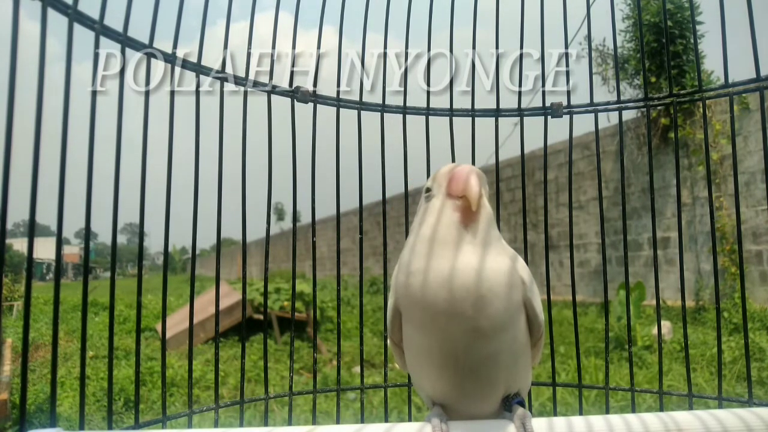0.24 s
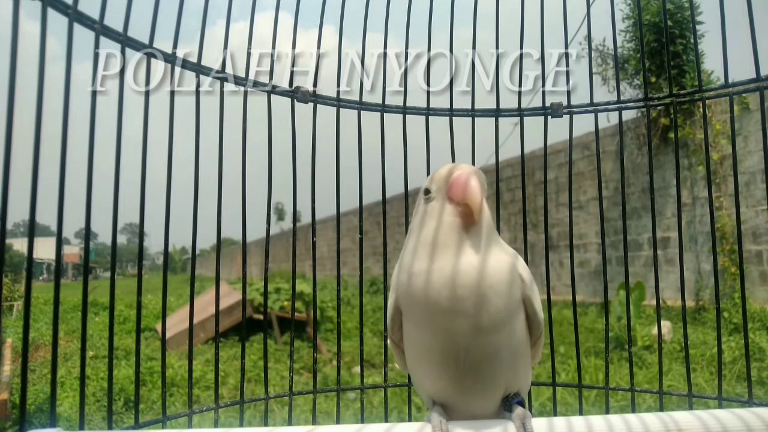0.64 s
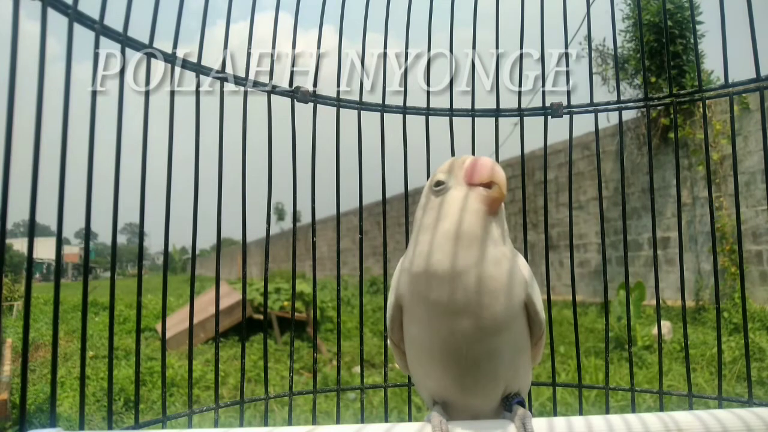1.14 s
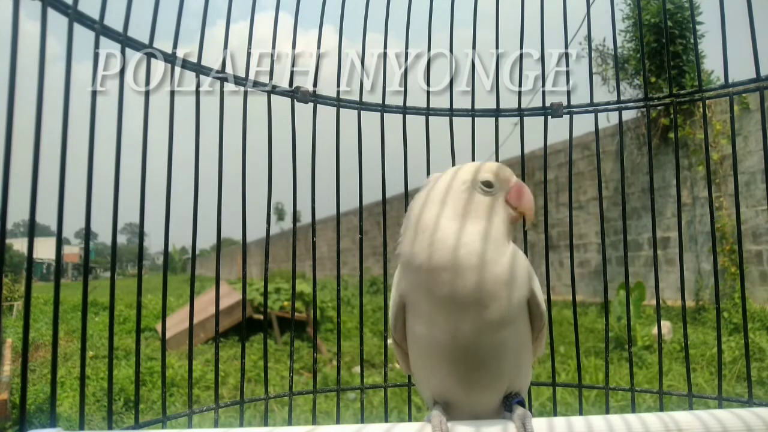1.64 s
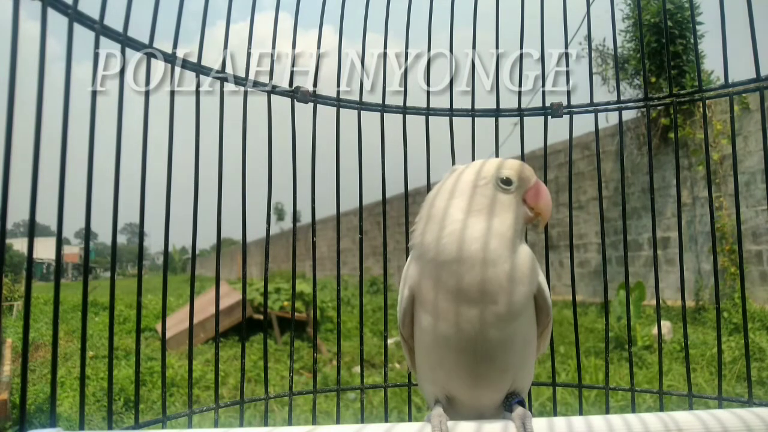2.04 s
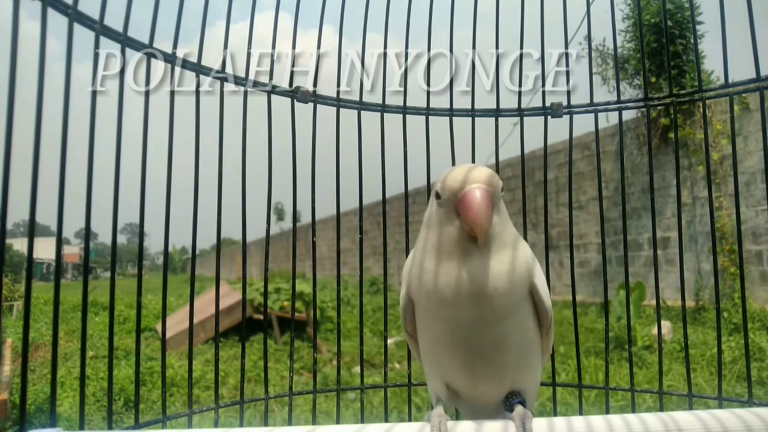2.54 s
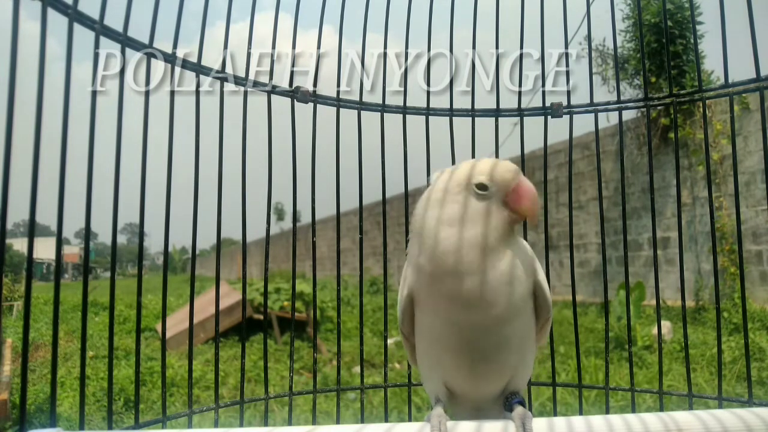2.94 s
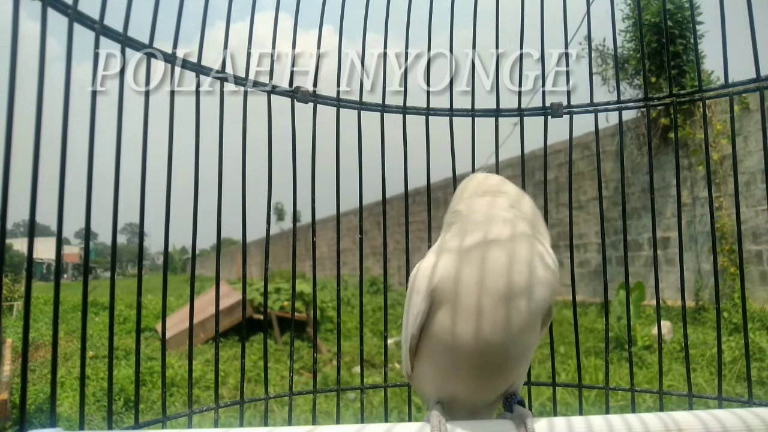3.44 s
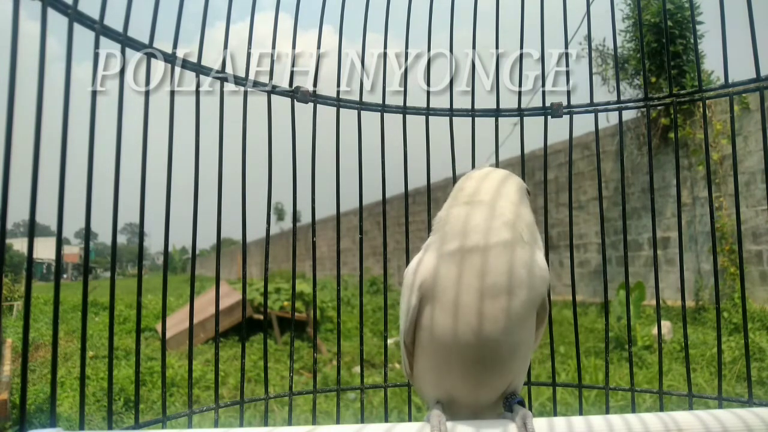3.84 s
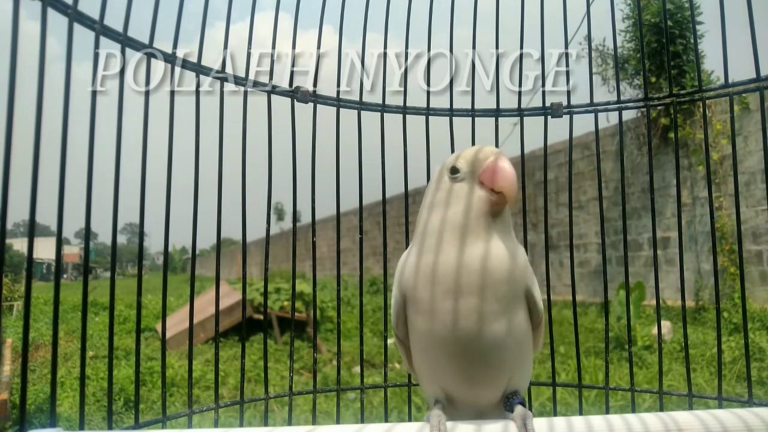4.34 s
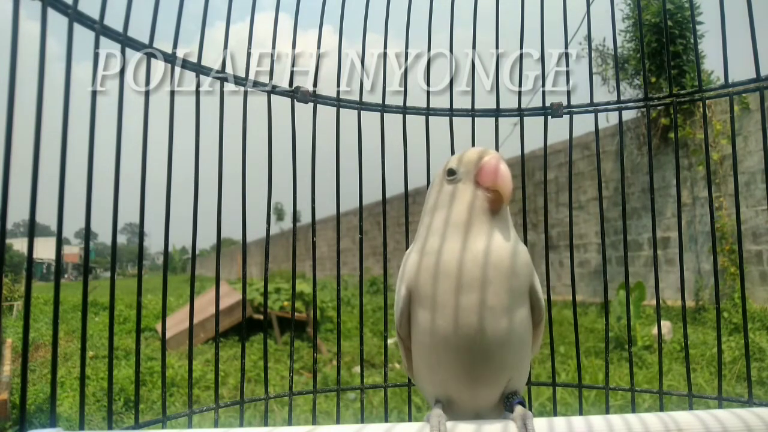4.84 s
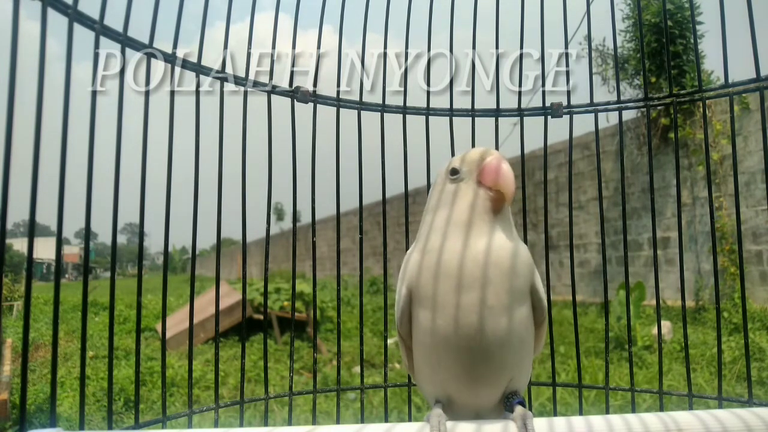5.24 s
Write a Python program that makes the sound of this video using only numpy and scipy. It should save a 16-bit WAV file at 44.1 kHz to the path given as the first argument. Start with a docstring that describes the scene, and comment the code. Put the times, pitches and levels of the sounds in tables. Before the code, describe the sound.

A caged lovebird gives four short shrill calls up close, with soft ticks between, a distant rooster and a low outdoor rumble.

```python
"""A caged lovebird, close to the microphone in a garden, gives four shrill calls with soft ticks between.
Each call is a quick run of notes, some clean whistles, some fast rasping warbles: the syrinx buzzes,
throat and beak colour the buzz, and every note glides, arches and swells with the push of air.
Far off a rooster crows, over a low outdoor rumble, two faint hums, soft hiss and a steady high whine."""
import sys
import numpy as np
from scipy import signal
from scipy.fft import rfft, irfft, next_fast_len
from scipy.io import wavfile

SR = 44100
rng = np.random.default_rng(int(sys.argv[2]) if len(sys.argv) > 2 else 0)


def master_out(mix):
    """Clip the mix to full scale and print it as 16-bit PCM to the path in sys.argv[1]."""
    frames = np.transpose(np.atleast_2d(mix))
    ceiling = np.clip(frames, -1, 1)
    pcm = np.round(ceiling * 32767).astype(np.int16)
    wavfile.write(sys.argv[1], SR, pcm)


N = 241668
TIME = np.arange(N) / SR
BAND_LIMIT_HZ = 15700


def amp(db):
    """Decibels to gain."""
    return np.exp(np.asarray(db) * np.log(10) / 20)


def unit_rms(x):
    """Scales to rms 1."""
    return x / np.sqrt(np.mean(x ** 2) + 1e-20)


def curve_at(points, hz):
    """Reads a curve on a log-frequency axis."""
    freqs, values = np.transpose(points)
    return np.interp(np.log(abs(hz) + 1), np.log(freqs + 1), values)


def add(mix, start_s, sound):
    """Mixes a sound in at its start time."""
    part = mix[round(start_s * SR):][:len(sound)]
    part += sound[:len(part)]


def noise(shape_db, n=N):
    """Noise of rms about 1 whose spectrum is a function of frequency."""
    size = next_fast_len(max(n, 4096))
    gains = amp(shape_db(np.fft.rfftfreq(size, 1 / SR)))
    return unit_rms(irfft(rfft(rng.standard_normal(size)) * gains, size))[:n]


def wander(rate_hz, n=N):
    """Random drift up to a given rate."""
    return noise(lambda f: -10 * np.log10(1 + (f / rate_hz) ** 4), n)


def hum(pitch_hz):
    """A slightly wavering tone of rms 1."""
    wavering_hz = pitch_hz * (1 + 0.01191 * wander(15))
    return unit_rms(np.sin(2 * np.pi * np.cumsum(wavering_hz) / SR))


# Low rumble of the open air: freq_hz, gain_db
RUMBLE_SPECTRUM = [(15, -6.5), (25, 2), (60, 4), (100, -8), (160, -14), (230, -16.5), (400, -21.5),
                   (600, -31), (1200, -39), (2600, -67)]
# The lower hum, swelling and fading in the background: time_s, level_db
DRONE_LEVELS = [(0, -73), (1.2, -48), (2.0, -58), (2.7, -48.5), (3.6, -59.5)]
# Soft hiss around the microphone: freq_hz, gain_db
HISS_SPECTRUM = [(300, 1), (900, 0), (2500, 1.5), (4000, -4), (6000, -3.5), (8200, 0), (10500, -5.5),
                 (11800, -16), (15300, -10)]
# The hiss holds, then sinks: time_s, level_db
HISS_LEVELS = [(3.6, -60.5), (4.6, -67)]
# A narrow high whine behind the birds: freq_hz, gain_db
WHINE_SPECTRUM = [(8000, -45), (8800, -18.5), (9400, -6), (9900, 2.5), (10400, -8), (10900, -33),
                  (11500, -60)]

def outdoors(rumble_db=-41, hum_db=-57, whine_db=-56):
    """The garden's background: three bands of noise and two faint low tones."""
    rumble = amp(rumble_db) * noise(lambda f: curve_at(RUMBLE_SPECTRUM, f))
    steady_hum = amp(hum_db) * hum(pitch_hz=181)
    drone = amp(np.interp(TIME, *np.transpose(DRONE_LEVELS))) * hum(pitch_hz=110.7)
    hiss_db = np.interp(TIME, *np.transpose(HISS_LEVELS))
    hiss = amp(hiss_db) * noise(lambda f: curve_at(HISS_SPECTRUM, f))
    whine = amp(whine_db + .5 * wander(4)) * noise(lambda f: curve_at(WHINE_SPECTRUM, f))
    return rumble + steady_hum + drone + hiss + whine


# How long the garden takes to die away by 60 dB: freq_hz, decay_s
GARDEN_DECAY = [(500, 0.62), (3500, 0.33), (7000, 0.53), (14000, 0.15)]

def garden_scatter(sound):
    """Scatter from wall and plants, each band dying at its own speed."""
    hz, t, bands = signal.stft(rng.standard_normal(SR), SR, nperseg=256)
    decay = amp(-60 * t / curve_at(GARDEN_DECAY, hz)[:, None])
    tail = signal.istft(bands * decay, SR, nperseg=256)[1]
    tail *= 1 + 3 * np.exp(-np.arange(len(tail)) / SR / 0.023)  # near things answer first
    return signal.fftconvolve(sound, tail / np.linalg.norm(tail))[:N]


def gesture(length_s, first_hz, last_hz, bend, level_db, rise_db, swell_db, attack_s, release_s):
    """Pitch, level and gate of one sung note: a glide, on which pitch and level arch with the breath."""
    t = np.arange(round(length_s * SR)) / SR
    progress = t / length_s
    arch = 1 - (2 * progress - 1) ** 2
    hz = first_hz * (last_hz / first_hz) ** progress * (1 + bend * arch)
    contour_db = level_db + rise_db * (progress - .5) + swell_db * (arch - 1)
    ramp = np.minimum(t / (attack_s + 1 / SR), (length_s - t) / (release_s + 1 / SR))
    gate = np.sin(np.pi / 2 * np.clip(ramp, 0, 1)) ** 2
    return hz, contour_db, gate


# The rooster's throat, heard from far off: freq_hz, gain_db
ROOSTER_THROAT = [(700, 1), (1050, -2), (1450, -11), (1850, 10), (2150, 1.5), (2900, -45.5), (4400, -30),
                  (5700, -17.5), (6500, -16.5), (7700, -12)]
# Narrow dips and peaks in its colour: centre_hz, width_hz, gain_db
ROOSTER_COLOUR = [(751.3, 27.85, -17), (1490, 80, 3.5), (2250, 128, -12), (7564, 230, 12)]
# One crow, far from the microphone: start_s, length_s, first_hz, last_hz, bend_share,
# level_db, rise_db, second_harmonic_db, higher_overtones_db, hoarseness_share
ROOSTER_SYLLABLES = [(2.519, .21, 606.5, 606, 0.029, -63, -4, 0.5, -5.5, .9),
                     (2.828, 0.24, 699, 714, 0.021, -51, 3, -7, -4.5, 0.86),
                     (3.046, .42, 718.3, 682.7, 0.027, -51, -7.5, -8, -3.5, 0.85),
                     (3.641, .25, 679.7, 726.6, 0.0027, -52, 5.5, -18.5, -15, 0.57),
                     (3.855, .50, 732, 683, .062, -52.5, -4, -3.5, -17.5, 0.3)]

def rooster():
    """A distant crow; a hoarse shake smears its overtones, which fade in and out on the way over."""
    crow, order = np.zeros(N), np.arange(1, 12)[:, None]
    for start_s, *shape, second_db, overtones_db, hoarse in ROOSTER_SYLLABLES:
        hz, level_db, gate = gesture(*shape, swell_db=2, attack_s=0.023, release_s=0.068)
        n, harmonic_hz = len(hz), order * hz
        shake = hoarse * (.03 * wander(160, n) + .004 * wander(25, n))
        phase = 2 * np.pi * np.cumsum(hz * (1 + shake)) / SR
        colour_db = sum(db * np.exp(-2 * ((harmonic_hz - centre) / width) ** 2)
                        for centre, width, db in ROOSTER_COLOUR)
        balance_db = second_db * (order == 2) + overtones_db * (order > 2)
        gains = amp(curve_at(ROOSTER_THROAT, harmonic_hz) + colour_db + balance_db)
        fading = amp(.9 * np.sqrt(order) * np.array([wander(22, n) for _ in order]))
        voice = (gains * fading * np.sin(order * phase)).sum(0)
        uneven = 1 + .25 * hoarse * np.sin(phase / 2)  # alternate cycles are stronger
        add(crow, start_s, gate * amp(level_db) * uneven * voice)
    return crow


# The lovebird's throat, heard close up: freq_hz, gain_db
LOVEBIRD_THROAT = [(300, -37), (1000, -34), (1300, -35), (1750, -15), (2300, -8.5), (3300, -7),
                   (4150, -6.5), (6100, -1.5), (7000, -4.5), (8000, 4.5), (10300, -2.5), (11800, 4),
                   (13300, -1), (14400, -9), (15700, -19.5)]

def throat_db(hz):
    """The lovebird's throat passes the treble and holds back the lows."""
    return curve_at(LOVEBIRD_THROAT, hz)


def syrinx(hz, rough, tract_db, tilt_db_per_octave, jitter=.07, flutter_db=2.6, air_db=-9):
    """Harmonics and air pass the vocal tract; roughness shakes each cycle's length and strength."""
    n, order = len(hz), np.arange(1, 9)[:, None]
    phase = 2 * np.pi * np.cumsum(hz * (1 + jitter * rough * wander(1500, n))) / SR
    gains = amp(tilt_db_per_octave * np.log2(order)) * (order * hz < BAND_LIMIT_HZ)
    passed_rms = np.sqrt(((gains * amp(tract_db(order * hz))) ** 2).sum(0) / 2 + 1e-12)
    buzz = (gains * np.sin(order * phase)).sum(0) / passed_rms  # the level holds as the pitch moves
    buzz *= amp(flutter_db * rough * (wander(550, n) - 2))
    size = next_fast_len(2 * n)
    tract = amp(tract_db(np.fft.rfftfreq(size, 1 / SR)))
    tone = irfft(rfft(buzz, size) * tract, size)[:n]
    air = noise(lambda f: tract_db(f) - 4 * np.log2(1 + f / 3000), n)
    return tone + amp(air_db) * rough ** 1.25 * air


def tick(level_db, decay_s, rough, pitch_hz=2650, rattle_s=0.0022, rattle_db=-7):
    """The syrinx snaps for a few cycles and stops; the tick rattles on briefly between the bars."""
    t = np.arange(900) / SR
    voice = syrinx(np.full(len(t), pitch_hz), rough, throat_db, tilt_db_per_octave=-9.5)
    snap = voice * t / decay_s * np.exp(1 - t / decay_s)
    bars = rng.standard_normal(len(t)) * np.exp(-t / rattle_s)
    snap += amp(rattle_db) * signal.fftconvolve(snap, bars / np.linalg.norm(bars))[:len(t)]
    low_cut = signal.butter(4, 1900, "high", fs=SR, output="sos")
    return amp(level_db) * signal.sosfilt(low_cut, snap)


# The beak, set anew for each call:
# from_s, resonance_hz, width_hz, boost_db, treble_db_per_octave, overtone_db_per_octave
BEAK_SETTINGS = [(0, 4700, 2400, 7, 6, -7.5), (1, 4950, 1300, 15, 3, -6), (3, 4550, 1200, -3, -5, -10),
                 (5, 5000, 1700, 8, -3, -6.5)]

def note(start_s, length_s, shape, rough, warble_hz=185, warble_depth=.135, throb_db=1, full_db=-11):
    """As the voice roughens, a second, slower vibration swings its pitch and level."""
    hz, level_db, gate = gesture(length_s, *shape, swell_db=7.5, attack_s=.0011, release_s=.092 * length_s)
    n = len(hz)
    beak = [row for row in BEAK_SETTINGS if row[0] <= start_s][-1]
    _, beak_hz, width_hz, boost_db, treble_slope, overtone_slope = beak

    def tract_db(f):
        """The throat, with the beak's resonance and treble slope."""
        resonance_db = boost_db / (1 + (2 * (f - beak_hz) / width_hz) ** 2)
        return throat_db(f) + resonance_db + treble_slope * np.log2(np.maximum(f / 7000, 1))

    warble_phase = 2 * np.pi * np.cumsum(warble_hz * (1 + .25 * wander(120, n))) / SR
    warble = np.tanh(2.5 * rough) * np.sin(warble_phase)
    quaver = .005 * wander(45, n)
    voice = syrinx(hz * (1 + warble_depth * warble + quaver), rough, tract_db, overtone_slope)
    dull = signal.sosfiltfilt(signal.butter(3, 10500, fs=SR, output="sos"), voice)
    treble_gain = amp(0.95 * np.minimum(level_db - full_db, 0))  # a soft voice loses its treble
    voice = dull + (voice - dull) * treble_gain
    tremor_db = 1.57 * wander(70, n)
    return voice * amp(level_db + throb_db * warble + tremor_db) * gate


# Soft ticks from the bird's throat between calls: start_s, level_db, decay_s, roughness
LOVEBIRD_TICKS = [(1.0221, -31.5, 0.0004, 0), (1.1545, -32, 0.00036, 0.12), (1.7016, -25.5, 0.00042, 0.19),
                  (2.2300, -30, 0.0005, 0.33), (2.7383, -26, 0.00051, 0.42), (3.3993, -31.5, 0.00028, 1.07),
                  (3.4070, -29, 0.00091, 0.7), (3.4162, -39.5, 0.00069, 0.66),
                  (4.5049, -28.5, 0.00048, 0.31), (5.2541, -30.5, 0.00054, 0.42)]
# Close to the microphone, a chip, a squawk, a falling shriek and a rising one:
# start_s, length_s, first_hz, last_hz, bend_share, level_db, rise_db, roughness
LOVEBIRD_NOTES = [ (0.0772, 0.01, 2253, 2400, 0.05, -17.5, -6, 0.07),
                  (0.085, 0.012, 3040, 3618, 0.038, -5, 14.5, 0.92),
                  (.0940, 0.016, 3640, 3720, 0.025, -14, 0, 0.2),
                  (1.158, 0.017, 3260, 2360, -0.015, -11, -4.5, 0.58),
                  (1.1700, .0950, 2285, 2250, .052, -7.4, .5, .001),
                  (1.2640, 0.011, 2350, 2390, -0.026, -12, -5, 0.1),
                  (1.273, 0.053, 2873, 2620, 0.026, -7, -0.5, 0.73),
                  (1.3210, 0.034, 2779, 2806, -0.03, -9, -13, 0.56),
                  (3.0861, 0.0037, 6200, 6300, 0.049, -16, 5, 0.83),
                  (3.0910, 0.017, 6200, 5336, .12, -6, 7, 0.05),
                  (3.1085, 0.017, 5620, 6090, 0.11, -3, -0.5, 0.11),
                  (3.1265, 0.049, 5183, 2314, 0.066, -11.5, -15, .28),
                  (3.163, .0640, 2763, 1900, .12, -21.5, -1, 0.37),
                  (3.2460, 0.012, 1754, 1745, 0.025, -27, -10, 0.27),
                  (5.382, 0.00826, 1940, 2780, -0.074, -16.5, 18.5, 0.26),
                  (5.389, 0.011, 2250, 3730, 0.1, -14, 5.5, 0.37),
                  (5.395, 0.0085, 3950, 3680, .15, -8, 10, 0.31),
                  (5.4021, 0.0037, 4100, 3723, 0.063, -5.5, 2.5, 0.11),
                  (5.4056, .0120, 2794, 2955, -0.15, -8, 5, 0.22),
                  (5.4133, 0.015, 5025, 6230, -0.022, -5.5, 10, 0.25),
                  (5.4283, 0.026, 6550, 6670, .02, -8, -18, 0.08)]

def lovebird():
    """Notes and ticks, with quick reflections from the cage tray and surroundings."""
    direct = np.zeros(N)
    for start_s, length_s, *shape, rough in LOVEBIRD_NOTES:
        add(direct, start_s, note(start_s, length_s, shape, rough))
    for start_s, *snap in LOVEBIRD_TICKS:
        add(direct, start_s, tick(*snap))
    bird = direct.copy()
    for delay_s, gain_db in [(.0014, -28.5), (.0026, -14), (.0061, -28.5)]:
        add(bird, delay_s, amp(gain_db) * direct)
    return bird


def scene():
    """One microphone in the garden: the near bird almost dry, the far rooster deep in scatter."""
    bird, crow = lovebird(), rooster()
    near = bird + amp(-25) * garden_scatter(bird)
    far = crow + garden_scatter(crow)
    return (near + far + outdoors())[None]


def record(dry, ceiling=.98):
    """The loudest peaks are rounded off; then the highest treble is cut."""
    rounded = dry / (1 + (dry / ceiling) ** 14) ** (1 / 14)
    low_pass = signal.firwin(401, BAND_LIMIT_HZ, window=("kaiser", 8), fs=SR)
    return signal.oaconvolve(rounded, low_pass[None], "same")


dry = scene()
out = record(dry)
master_out(out)
```